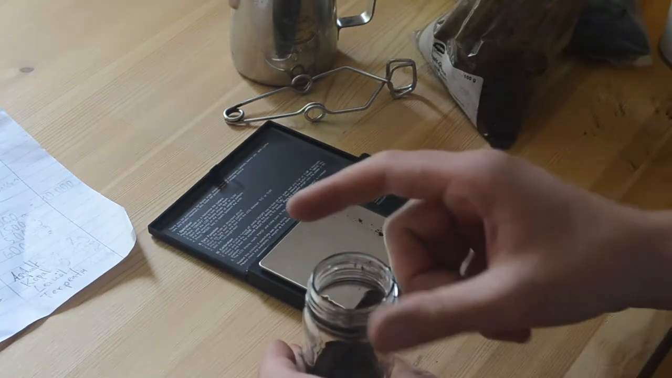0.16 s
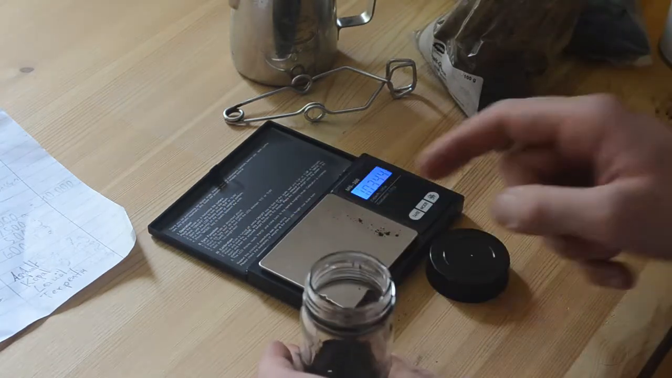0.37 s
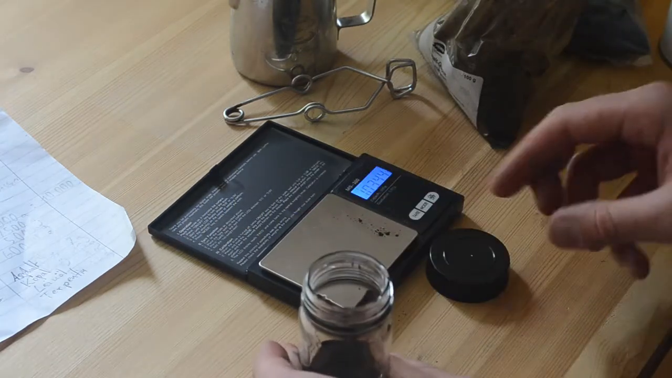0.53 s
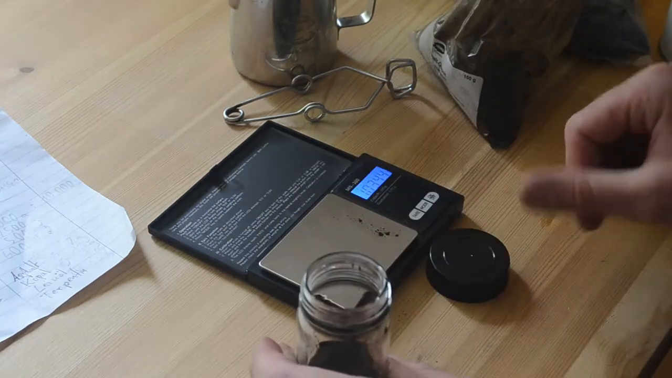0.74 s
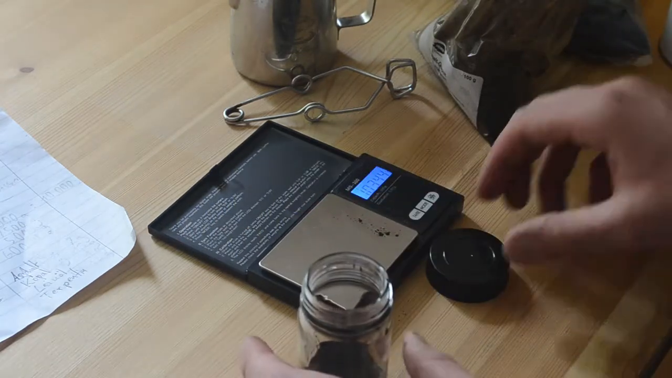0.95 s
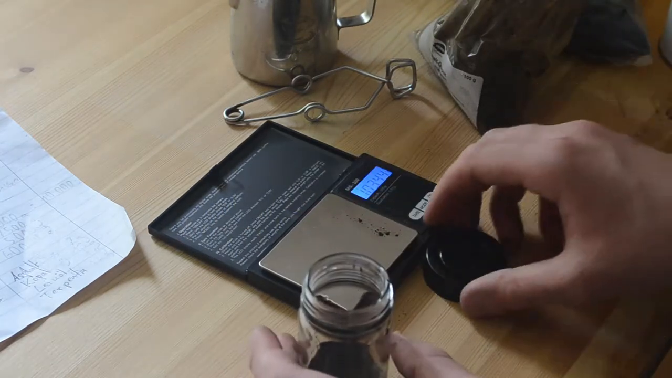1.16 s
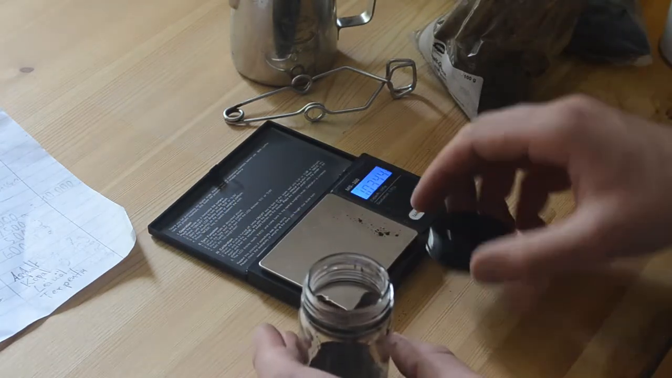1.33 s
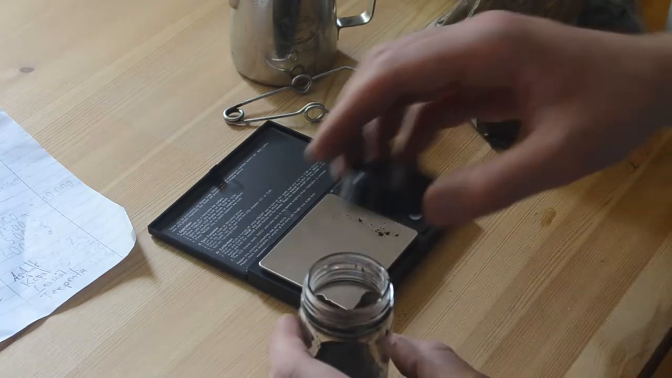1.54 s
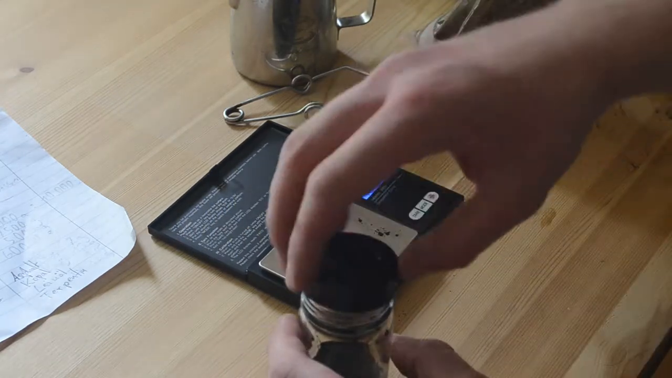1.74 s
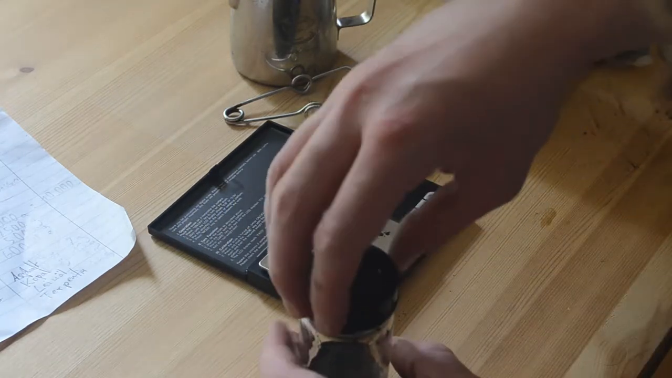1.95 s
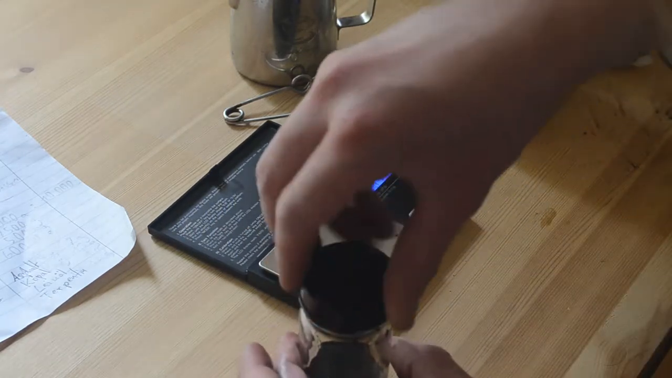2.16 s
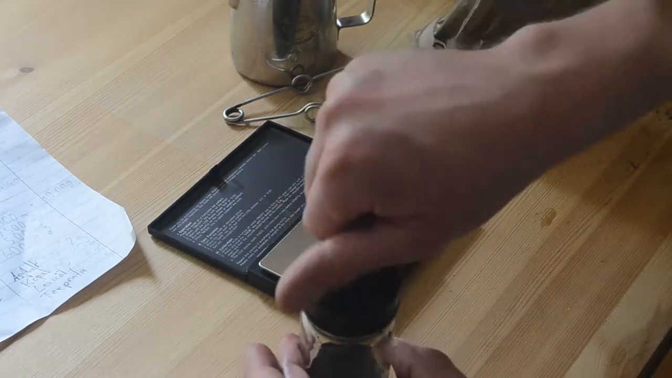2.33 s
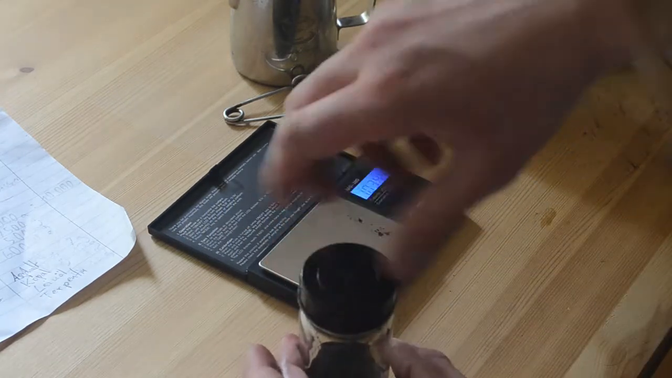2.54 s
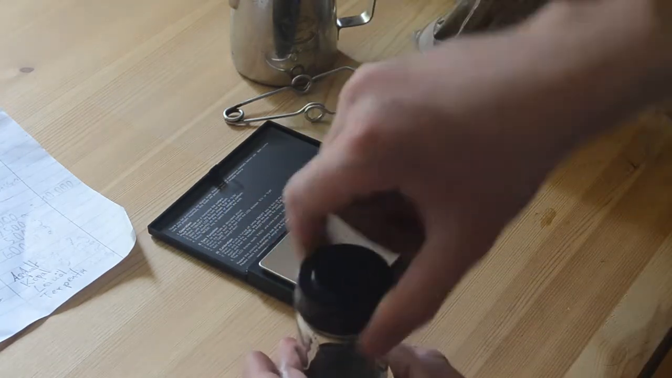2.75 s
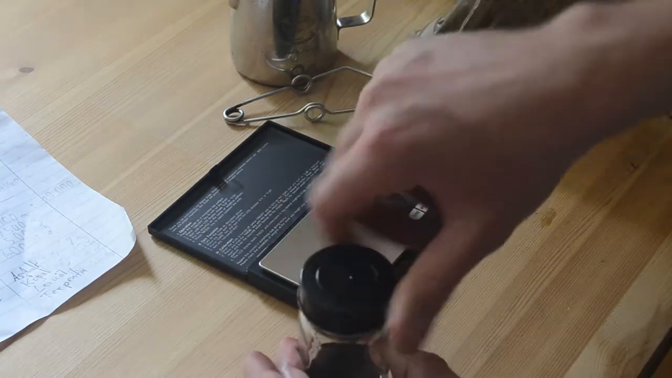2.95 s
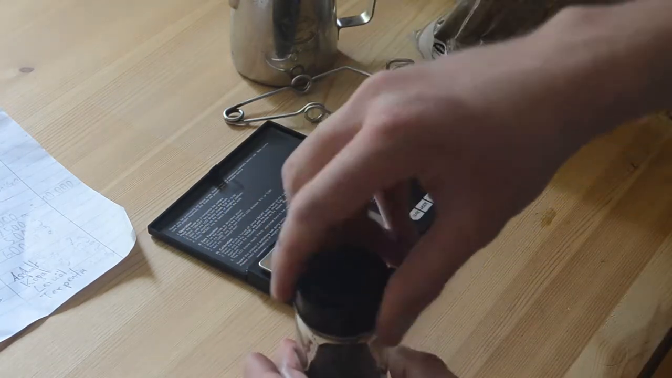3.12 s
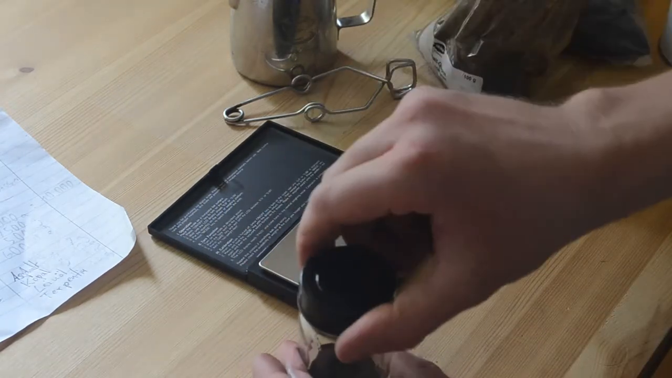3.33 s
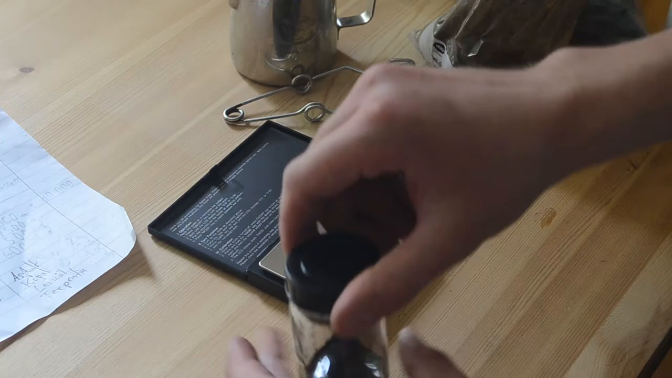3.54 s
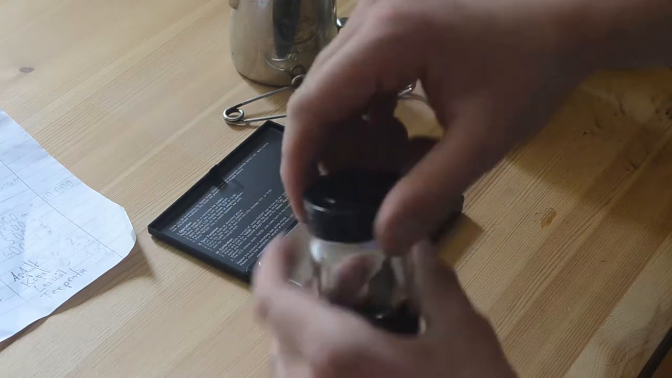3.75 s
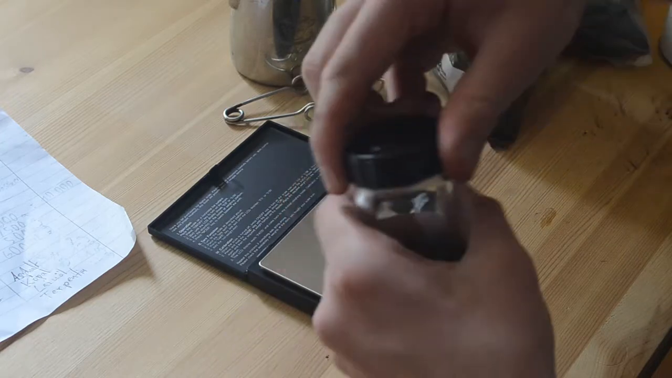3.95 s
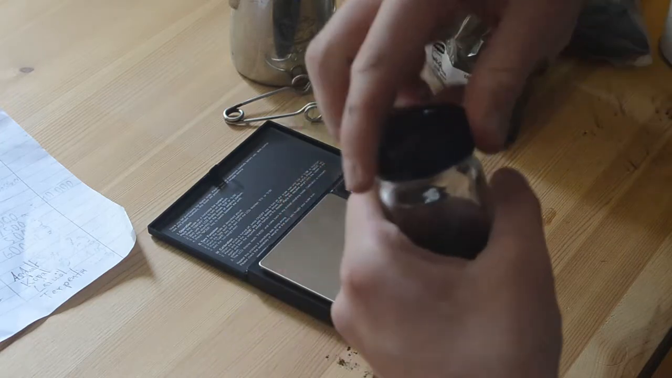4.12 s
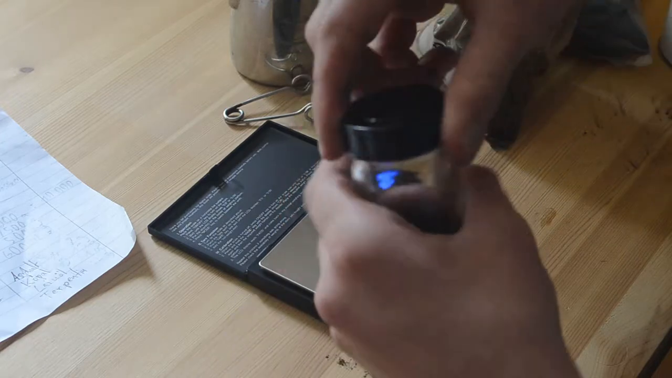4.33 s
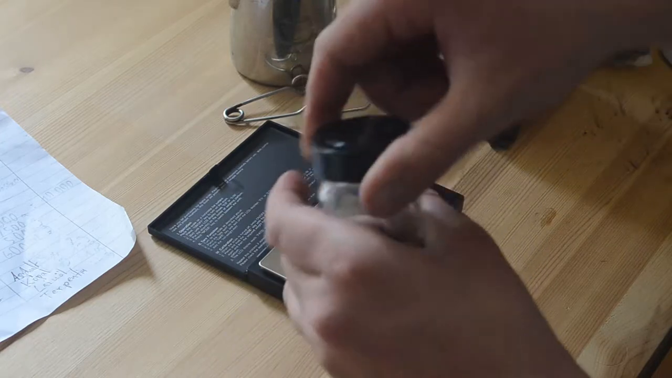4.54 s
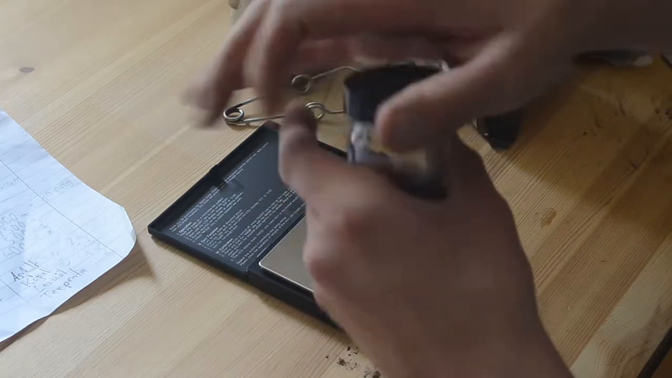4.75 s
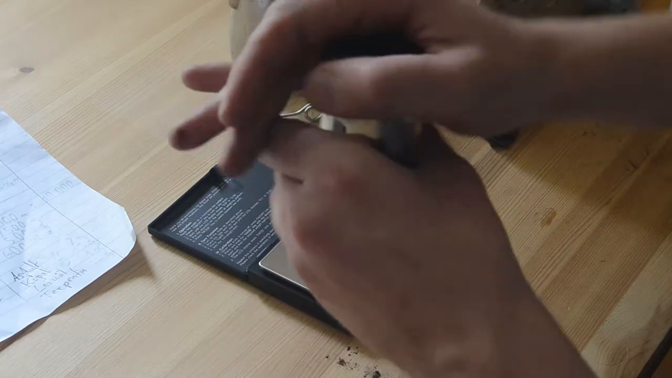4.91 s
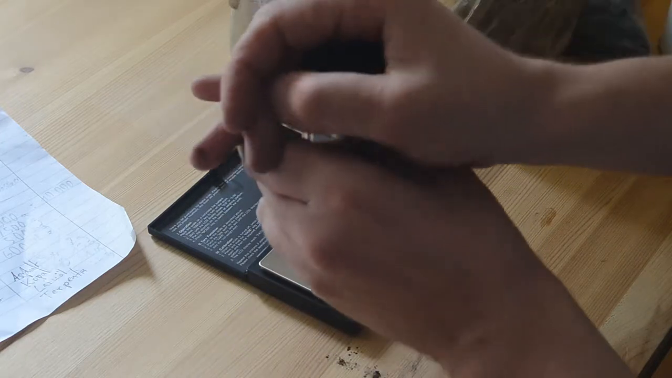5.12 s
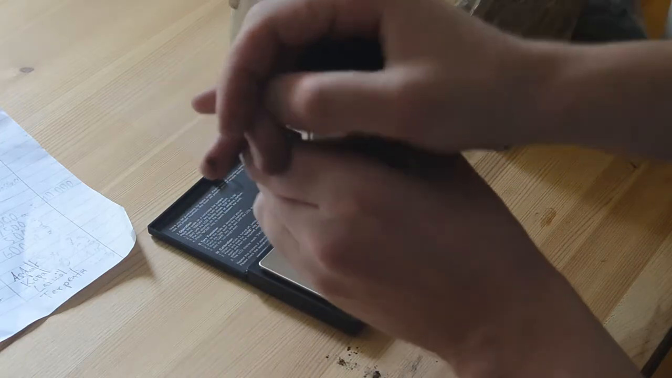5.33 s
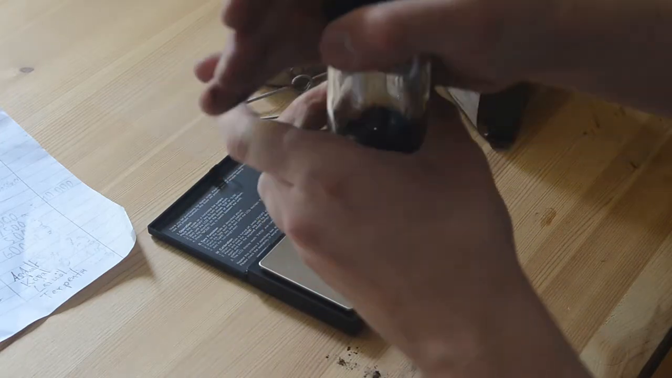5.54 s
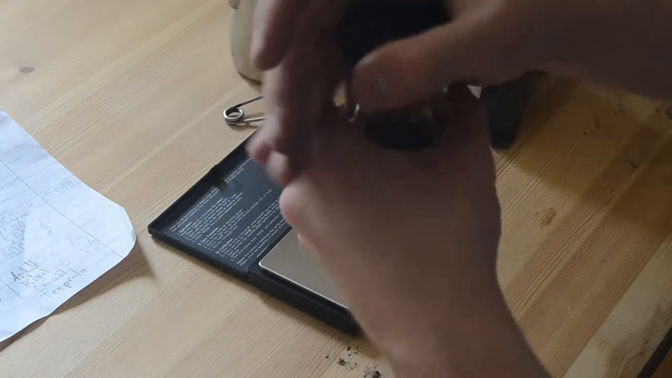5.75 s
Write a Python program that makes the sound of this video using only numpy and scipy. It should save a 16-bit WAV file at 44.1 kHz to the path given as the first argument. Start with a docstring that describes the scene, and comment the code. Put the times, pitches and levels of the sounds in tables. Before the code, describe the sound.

A small glass jar knocks on a wooden table, then a plastic lid clacks on, scrapes round and snaps into its thread.

```python
"""A room hisses and an appliance hums faintly while fingers brush a small glass jar.
The jar is set down on a wooden table; a plastic lid is picked up with thin squeaks, clacks onto the neck,
scrapes round, drops into the thread with a snap and is twisted shut while the jar rocks on the wood.
Knocks and clacks are struck resonances, sliding is trains of random slips, hiss is shaped noise, and hum
and squeaks are wavering sines; a synthetic room answers the jar, lid and fingers.
"""
import sys
import numpy as np
from scipy import signal
from scipy.fft import rfft, irfft
from scipy.io import wavfile
from scipy.ndimage import uniform_filter1d

SR = 44100
rng = np.random.default_rng(int(sys.argv[2]) if len(sys.argv) > 2 else 0)


def unload_wav(signal):
    """Save mono or channel-first audio to the path in sys.argv[1] as 16-bit WAV at rate SR, clipped to [-1, 1]."""
    wavfile.write(
        sys.argv[1],
        SR,
        np.round(np.clip(np.atleast_2d(signal).T, -1, 1) * 32767).astype(np.int16),
    )


N = 259158
TIME = np.arange(N) / SR
SHORT = TIME[:SR // 2]  # time axis of single hits and of the room response
TOP_HZ = 15700


def amp(db):
    """Decibels to gain."""
    return 10 ** (np.asarray(db) / 20)


def unit(x):
    """Scale to rms 1."""
    return x / np.sqrt(np.mean(x ** 2))


def blow(x, db):
    """Set a short sound's energy to that of 5 ms at the given rms level."""
    return x * amp(db) / np.sqrt(np.sum(x ** 2) / (.005 * SR))


def add(out, start_s, x):
    """Mix x into out from start_s."""
    i = max(int(start_s * SR), 0)
    out[i:i + len(x)] += x[:N - i]


def colour(x, points):
    """Filter by a spectrum of (Hz, dB) points, interpolated over log frequency."""
    hz, db = np.transpose(points)
    bin_hz = np.maximum(np.fft.rfftfreq(len(x), 1 / SR), 1)
    gain = amp(np.interp(np.log(bin_hz), np.log(hz), db))
    return irfft(rfft(x) * gain, len(x))


def soften(x, hz):
    """A softer contact lasts longer and takes the treble away."""
    return signal.sosfilt(signal.butter(2, min(hz, TOP_HZ), fs=SR, output="sos"), x)


def radiate(x, hz):
    """Small things radiate little bass."""
    return signal.sosfilt(signal.butter(2, hz, "high", fs=SR, output="sos"), x)


def ring(modes, pitch=1, damping=1):
    """Impulse response of damped resonances; neighbouring modes swing in opposite directions."""
    total = np.zeros(len(SHORT))
    for k, (hz, width_hz, db) in enumerate(modes):
        gain = (-1) ** k * amp(db) * 2 * np.pi * width_hz / SR
        decay = np.exp(-np.pi * width_hz * damping * SHORT)
        total += gain * decay * np.sin(2 * np.pi * hz * pitch * SHORT)
    return total


def walk(rate_hz):
    """Slow chance: random steps at rate_hz, smoothed over one step."""
    count = int(SR / rate_hz)
    steps = np.repeat(rng.standard_normal(N // count + 1), count)[:N]
    return uniform_filter1d(steps, count)


def stroke(start_s, end_s):
    """A movement that swells and dies away."""
    u = np.clip((TIME - start_s) / max(end_s - start_s, .01), 0, 1)
    return np.sqrt(np.abs(np.sin(np.pi * u)))


def strokes(rows):
    """Sum of movements, each at its own level."""
    return sum(amp(db) * stroke(start_s, end_s) for start_s, end_s, db in rows)


def slips(rate_hz, spread_db):
    """Friction: a dense train of tiny slips of random sign and uneven size."""
    size = amp(spread_db * np.minimum(rng.exponential(size=N), 4))
    return (rng.random(N) < rate_hz / SR) * size * rng.choice([-1, 1], N)


def background():
    """Steady room hiss under the slightly wavering hum of an appliance."""
    # room hiss spectrum: (frequency [Hz], gain [dB])
    hiss_spectrum = [(15, -56.5), (25, -26), (133, -13.5), (173, -13), (209, -6), (233, -11.5), (349, -9.5),
                     (378, -13), (495, -14.5), (1020, -17), (1140, -17), (5140, -28.5), (5730, -29),
                     (7300, -30), (15500, -49)]
    # hum tones: (frequency [Hz], rms level [dB])
    hum_tones = [(204.6, -68.5), (349.9, -76)]
    hiss = unit(colour(rng.standard_normal(N), hiss_spectrum)) * amp(-64.5)
    speed = 1 + .006 * walk(8)
    hum = np.zeros(N)
    for hz, db in hum_tones:
        phase = 2 * np.pi * np.cumsum(hz * speed) / SR
        hum += np.sqrt(2) * amp(db + walk(7.9)) * np.sin(phase)
    return hiss + hum


def room(x):
    """Near walls answer within milliseconds; a diffuse tail fades while standing waves ring on."""
    # standing waves: (frequency [Hz], width [Hz], gain [dB])
    standing_waves = [(42, 12.13, 3), (78.5, 4.7, 4.5), (172, 12, 6.5), (225, 12, -10), (295.5, 9.9, 11.5),
                      (320.7, 10, 1.5), (364, 7.8, -11.5), (392, 13, -1), (505, 3.7, -1.5), (531.4, 13, 4),
                      (572.5, 19, 5), (600, 7.2, 1), (671, 8.3, 4.5), (768, 4.7, -3.5), (853, 13, 8),
                      (880, 9.3, 3.5), (936, 16, 1), (1085.4, 19, -3), (1195, 14, 1.5), (1210, 22, 3),
                      (1490, 28, 2.5), (1680, 13, 0), (1960, 13, -3.5), (2123, 15, 1), (2115, 13, -11),
                      (2375, 19, -0.5), (2516, 27, 3.5), (2636, 26, 1)]
    # reflection spectrum: (frequency [Hz], gain [dB])
    wall_spectrum = [(80, -5), (250, -7.5), (600, 1.5), (1100, -7), (1600, -6), (2300, -5), (4000, -2.5),
                     (7000, 2), (14000, -7)]
    low_t60_s, treble_t60_s = 0.24, 0.16
    gap_s, build_s, modes_db = .0015, .002882, -0.5

    age_s = np.maximum(SHORT - gap_s, 0)

    def fade(t60_s):
        return np.exp(-np.log(1000) * age_s / t60_s)

    noise = rng.standard_normal(len(SHORT))
    low = colour(noise, [(1500, 2), (6000, -20)])
    tail = low * fade(low_t60_s) + (noise - low) * fade(treble_t60_s)
    diffuse = colour(tail / np.sqrt(np.sum(tail ** 2)), wall_spectrum)
    diffuse *= 1 - SHORT / SHORT[-1]  # taper to zero
    response = diffuse + amp(modes_db) * ring(standing_waves)
    response *= 1 - np.exp(-age_s / build_s)
    return x + signal.fftconvolve(x, response)[:N]


def squeak(start_s, end_s, first_hz, turn_hz, db):
    """Thin inharmonic tones that glide in an arc, swell and waver."""
    turn_share, swell_db = .75, 11  # the glide turns back at this share of its length
    arc = (1 - np.clip((TIME - start_s) / (end_s - start_s), 0, 1) / turn_share) ** 2
    pitch_hz = turn_hz + (first_hz - turn_hz) * arc
    tones = np.zeros(N)
    for ratio, part_db in ((1, 0), (1.18, -2), (1.38, -3)):
        level = amp(part_db + 3.5 * walk(24.9))
        waver = 1 + 0.0097 * walk(290) + 0.012 * walk(18)
        tones += level * np.sin(2 * np.pi * np.cumsum(pitch_hz * ratio * waver) / SR)
    return tones * amp(db - swell_db * arc) * stroke(start_s, end_s)


def squeaks():
    """Thin, faint squeaks: gliding clusters of sines."""
    # (start [s], end [s], first pitch [Hz], turning pitch [Hz], level at the turn [dB])
    squeak_rows = [(1.365, 1.726, 4500, 6370, -72), (4.78, 4.933, 6960, 6150, -75)]
    return sum(squeak(*row) for row in squeak_rows)


def fingers():
    """Dry skin hisses as it slides and ticks as it lands."""
    # spectrum of sliding skin: (frequency [Hz], gain [dB])
    skin_spectrum = [(200, -8), (700, -2.5), (2500, 1), (5000, -2), (8000, 1), (10000, -13.5), (15000, -23)]
    # clear strokes over jar and lid: (start [s], end [s], level [dB])
    brushes = [(0.416, 0.508, -70.5), (1.13, 1.232, -68.5), (2.782, 2.798, -55), (4.547, 4.61, -68),
               (4.623, 4.697, -71), (5.403, 5.526, -66.5)]
    # fingers shifting their hold: (start [s], end [s], mean level [dB])
    handling = [(.08, .24, -75.5), (.6, .92, -75.5), (1.4, 1.58, -75), (4.08, 5.1, -72)]
    # fingertips and nails touching: (time [s], level [dB], contact cut-off [Hz])
    ticks = [(0.243, -53.5, 1010), (1.106, -48.5, 2630), (1.378, -63.5, 12330), (2.097, -53.5, 2210),
             (2.896, -58, 1810), (2.947, -52, 1640), (3.517, -55.5, 3000), (3.611, -50.5, 2960),
             (4.109, -54, 4960), (5.426, -51, 8160)]
    shifts_per_s, shift_db = 12, 4.5

    hiss = unit(colour(slips(rate_hz=10000, spread_db=6.5), skin_spectrum)) * amp(2.4 * walk(30))
    shifting = strokes(handling) * amp(shift_db * walk(shifts_per_s))
    out = hiss * np.hypot(strokes(brushes), shifting)
    for time_s, db, hz in ticks:
        tick = colour(rng.standard_normal(len(SHORT)), skin_spectrum) * np.exp(-SHORT / 0.0045)
        add(out, time_s, blow(soften(tick, hz), db))
    return out


def thread():
    """Plastic slides on wood or glass in uneven little slips."""
    # spectrum of sliding plastic: (frequency [Hz], gain [dB])
    plastic_spectrum = [(150, -34), (350, -1.5), (900, -4.5), (1500, 1.5), (2400, -2), (3100, -10),
                        (4000, -4.5), (5300, -12.5), (8000, -7), (10500, -17), (15000, -24)]
    # slides: (start [s], end [s], level before softening [dB], cut-off [Hz])
    scrapes = [(1.096, 1.234, -59, 4020), (1.84, 1.964, -64, 4970), (2.084, 2.181, -53.5, 7100),
               (2.194, 2.268, -51, 7000), (2.264, 2.335, -58, 7860), (2.658, 2.718, -39.5, 4000),
               (2.723, 2.833, -57, 8500), (2.897, 2.96, -60.5, 2500), (3.141, 3.241, -61.5, 5240),
               (4.225, 4.35, -64, 2213)]
    grit = unit(colour(slips(rate_hz=2200, spread_db=2.0), plastic_spectrum)) * amp(2 * walk(70))
    out = np.zeros(N)
    for start_s, end_s, db, hz in scrapes:
        out += amp(db) * stroke(start_s, end_s) * soften(grit, hz)
    return out


def jar():
    """The glass base knocks the table and rocks onto its edge; hand pressure drives more bass into the wood."""
    # table top resonances: (frequency [Hz], width [Hz], gain [dB])
    wood_modes = [(315, 74, -8.5), (550, 220, -3.5), (874, 110, 3.5), (1018, 320, 0.5), (1240, 85, 0.5),
                  (1580, 720, -7.5), (2085, 140, -5), (2600, 310, -24), (4140, 330, -20),
                  (6500, 1800, -21.5)]
    # base on table: (time [s], level [dB], contact cut-off [Hz],
    #                 second touch delay [s], second touch relative to first [dB])
    knocks = [(0.29, -12, 1370, .0057, -11.5), (0.786, -58.5, 280, .012, -15),
              (2.394, -25, 770, .0127, -8.5), (2.493, -53, 590.7, .012, -11),
              (2.6452, -26, 1680, .0428, -19), (2.944, -40, 340, .0035, 5.5), (3.509, -50, 752, .009, 3)]
    press_start_s, press_end_s = 2.3, 3.1
    pressed_bass_hz, free_bass_hz = 188, 322  # bass cut-off of a knock
    edge_brighter = 1.5  # the edge meets the wood harder: factor on the contact cut-off
    sympathy = [(761, 2.8, -0.5)]  # something on the table rings on faintly (Hz, width Hz, dB)

    out, wood = np.zeros(N), ring(wood_modes)
    for time_s, db, hz, after_s, second_db in knocks:
        bass_hz = pressed_bass_hz if press_start_s < time_s < press_end_s else free_bass_hz
        first = radiate(soften(wood, hz), bass_hz)
        second = radiate(soften(wood, hz * edge_brighter), bass_hz)
        add(out, time_s, blow(first, db))
        add(out, time_s + after_s, blow(second, db + second_db))
    return out + signal.fftconvolve(out, ring(sympathy))[:N]


def lid():
    """Each clack rings the plastic shell, its rim and the air in the jar; the grip detunes and damps the plastic."""
    # shell resonances, then rim resonances: (frequency at pitch 1 [Hz], width at damping 1 [Hz], gain [dB])
    shell_modes = [(926, 139, -17), (1447, 52, 5.5), (1980, 810, 3), (2656, 790, 8.5), (3460, 450, -0.5),
                   (4270, 420, 1), (6366, 386, -5), (8370, 840, -8.5), (10820, 3300, -44)]
    rim_modes = [(2125, 64, -0.46), (2432, 89, 0.34), (2693, 180, 1)]
    # jar air as the lid covers the mouth: (time [s], frequency [Hz], level relative to shell [dB])
    jar_air = [(1.719, 735, -2.5), (1.898, 588, 1.5), (1.93, 594, -8), (2.65, 647, -10)]
    # lid on glass neck: (time [s], shell level before the bass cut [dB], contact cut-off [Hz],
    #                     pitch factor [1], rim relative to shell [dB])
    clicks = [(1.7176, -25.5, 7490, .975, 7.5), (1.7232, -29, 10740, 1.005, 3),
              (1.737, -33.5, 7940, 0.83, -10.5), (1.795, -51, 4000, 1.03, -14), (1.8582, -51.5, 5000, 1, 1),
              (1.8978, -37.5, 10000, 1, -5), (1.923, -43.5, 3560, 1.07, 3.5),
              (1.936, -39.5, 6200, 0.75, -15), (1.94, -41, 6160, .95, -13),
              (2.2402, -39.5, 1960, 0.99, -6.5), (2.338, -51, 3000, .86, -7), (2.398, -31.5, 5200, 1.0, -1),
              (2.6456, -17.5, 7000, 0.95, 0), (2.6865, -28, 2330, 0.94, 5), (2.7597, -43.5, 2000, 0.67, 5),
              (4.318, -62.5, 1800, 0.96, 5.5)]
    # a gripped lid strikes softer and is damped more
    hard_hz, hard_damping, grip_power = 6990, 1.16, .42

    out = np.zeros(N)
    air_s, air_hz, air_db = np.transpose(jar_air)
    for time_s, db, hz, pitch, rim_db in clicks:
        damping = hard_damping * (hard_hz / hz) ** grip_power
        shell = soften(ring(shell_modes, pitch, damping), hz)
        rim = soften(ring(rim_modes, pitch, damping), hz)
        air = soften(ring([(np.interp(time_s, air_s, air_hz), 135, 0)]), hz)
        add(out, time_s, blow(shell, db))
        add(out, time_s, blow(rim, db + rim_db))
        add(out, time_s, blow(air, db + np.interp(time_s, air_s, air_db)))
    return radiate(radiate(out, hz=282.6), hz=246.4)


def scene():
    """Jar, lid and fingers sound through the room; squeaks and background are added without it."""
    on_table = fingers() + thread() + jar() + lid()
    return (background() + squeaks() + room(on_table))[None]


def record(dry):
    """The microphone has a narrow dip in the treble; the top is cut off."""
    notched = signal.lfilter(*signal.iirnotch(5720, 8, fs=SR), dry)
    dipped = dry + 0.55 * (notched - dry)
    return signal.sosfilt(signal.ellip(10, .2, 70, TOP_HZ, fs=SR, output="sos"), dipped)


dry = scene()
out = record(dry)
unload_wav(out)
```